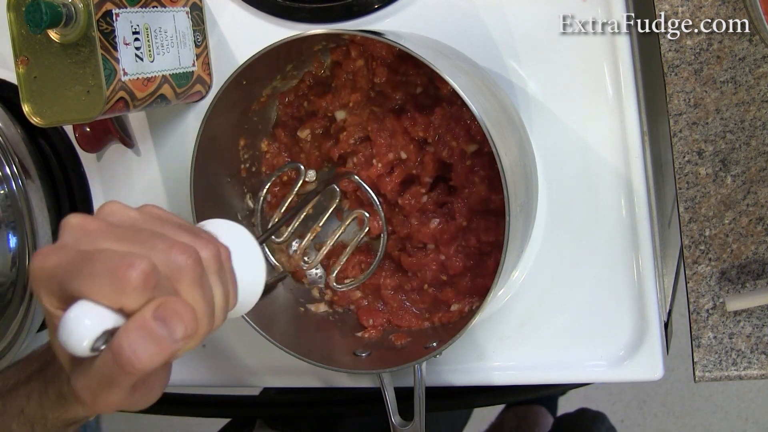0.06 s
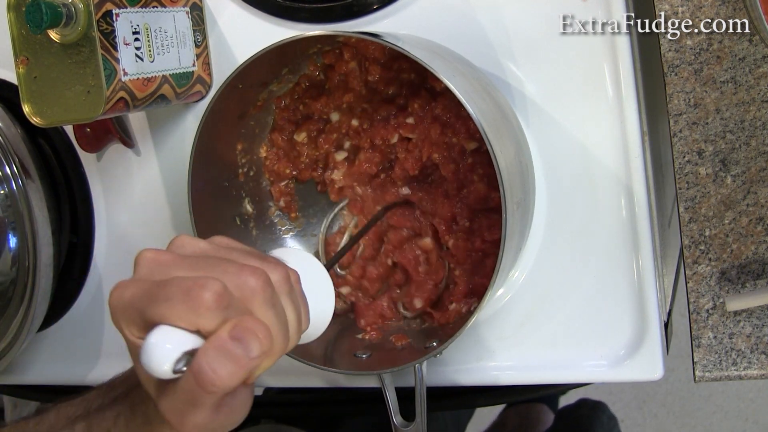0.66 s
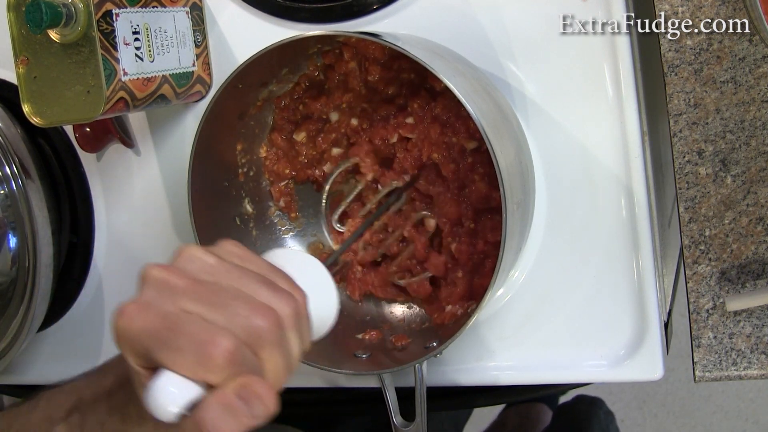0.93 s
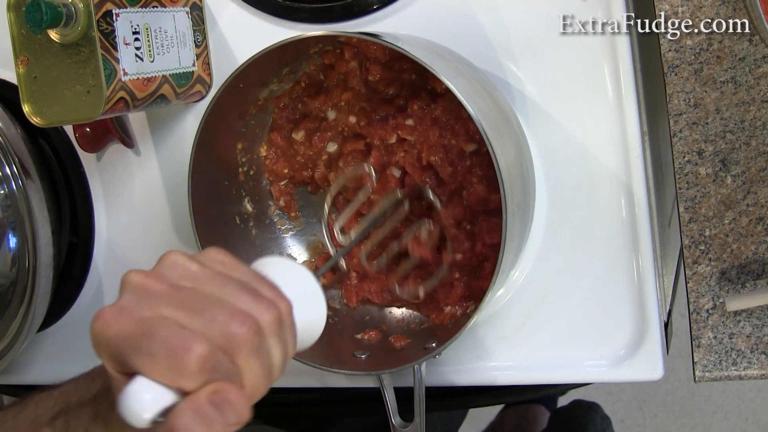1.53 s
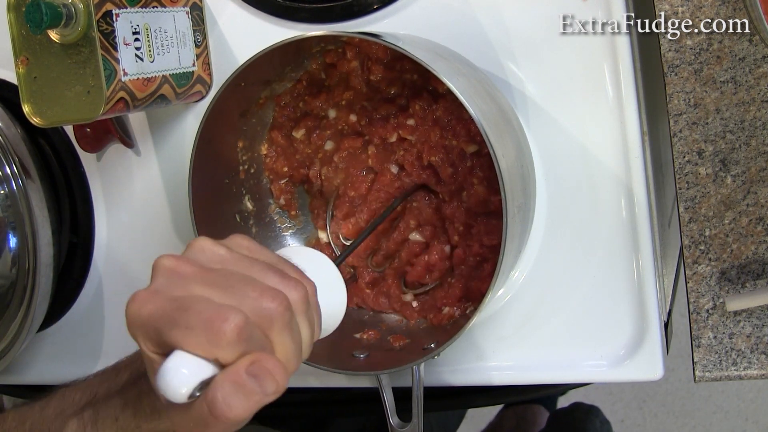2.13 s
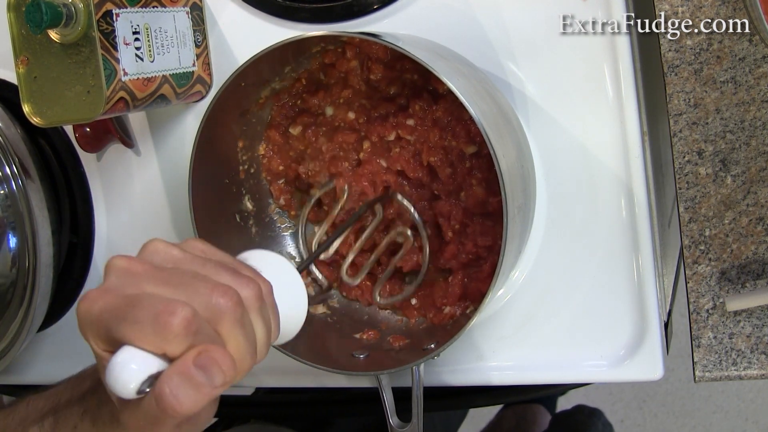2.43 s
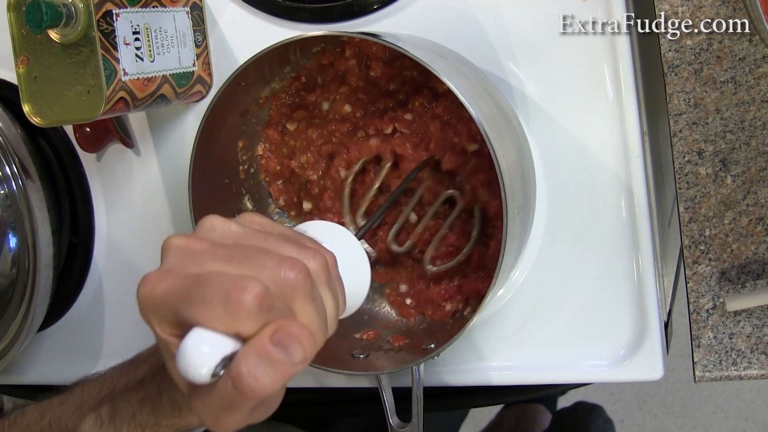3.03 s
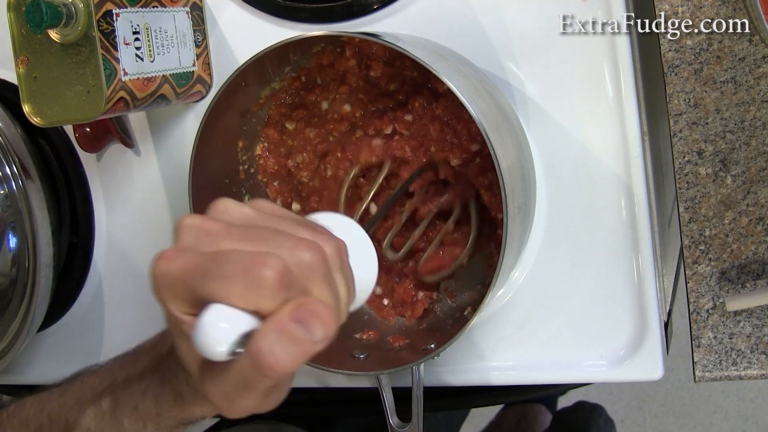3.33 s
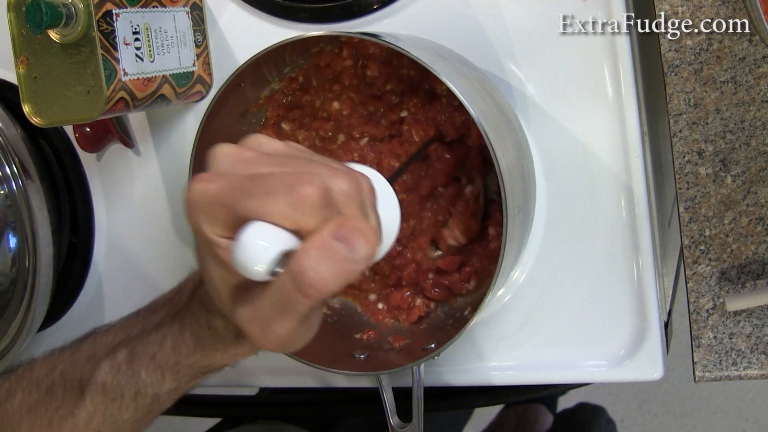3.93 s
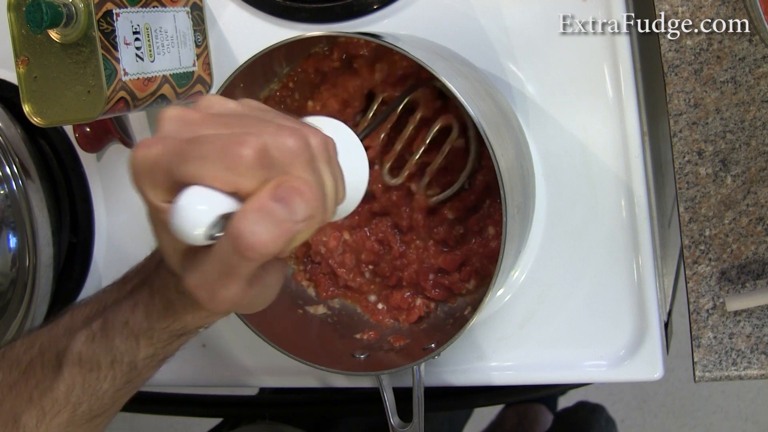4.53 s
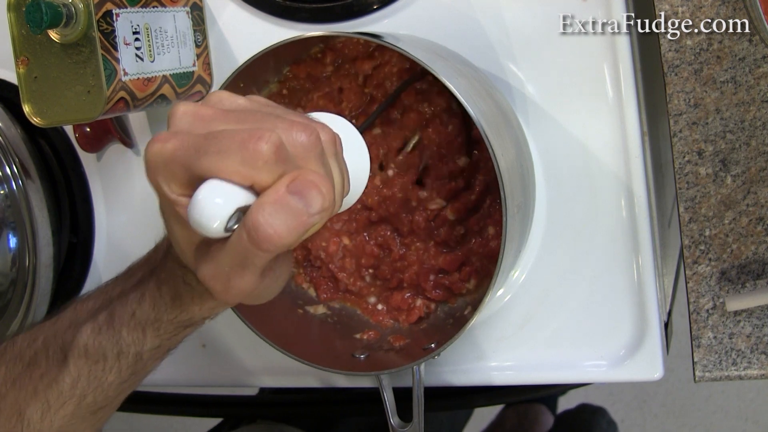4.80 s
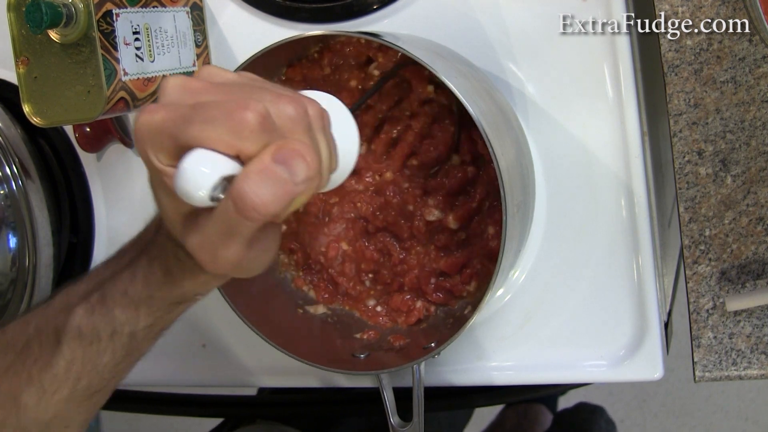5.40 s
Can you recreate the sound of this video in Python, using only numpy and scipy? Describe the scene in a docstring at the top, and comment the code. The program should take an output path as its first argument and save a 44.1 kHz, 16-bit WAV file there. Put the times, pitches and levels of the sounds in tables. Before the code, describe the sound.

A wire masher works tomatoes in a steel saucepan, heard close up in a small kitchen with faint low room noise. At about 0.1 seconds comes a sharp double clink with a bright, short ring, followed by brief scrapes and a judder across the pan bottom. Another hard, bright knock lands at 0.7 seconds, trailing into light scraping. From about 0.8 seconds the pulp squelches softly in uneven strokes, with small wet pops and fine crackles. Lighter knocks fall at 1.8 and 2.2 seconds, then a stronger one at 2.6 with a short, hollow judder. More ringing clanks follow at about 3.0, 3.3 and 3.9 seconds, mixed with the squishing. From 4 seconds the metal knocks stop, leaving quieter moist squelches and little popping air pockets until the end at around 5.6 seconds.

```python
"""A small kitchen, where a wire potato masher crushes tomatoes in a steel saucepan close to a camera.
Impact and friction excite the normal modes of wire and pan, so both ring with each knock and scrape.
The pulp squelches as its wet cells burst, air pockets pop as resonant cavities, and juice films crackle.
The camera's limiter ducks each hard knock and lets the ringing and the room swell back."""
import sys
import numpy as np
from scipy import signal
from scipy.fft import rfft, irfft, next_fast_len
from scipy.io import wavfile
from scipy.ndimage import uniform_filter1d, minimum_filter1d, map_coordinates

SR = 44100
rng = np.random.default_rng(int(sys.argv[2]) if len(sys.argv) > 2 else 0)


def unload_audio(sound):
    """Save the sound as a 16-bit wav file, at the path given as the first command line argument."""
    columns = np.transpose(np.atleast_2d(sound))
    # keep every value between -1 and 1, then stretch to whole-number steps
    steps = np.round(np.clip(columns, -1, 1) * 32767)
    wavfile.write(sys.argv[1], SR, steps.astype(np.int16))


N = 245195

# Larger air pockets in the pulp. Each row: start in seconds, level in dB, starting pitch in Hz,
# pitch rise in octaves, relative spray level in dB, cavity t60 (time to fall 60 dB) in seconds.
AIR_POCKETS = [(.051, -29.5, 7680, 0.83, -8.5, .012), (1.302, -23.5, 1040, 0, -5.5, 0.021),
               (1.75, -22, 2770, .22, -2.5, 0.016), (1.96, -29.5, 1907, 0, -32, .049),
               (2.2008, -22.5, 2570, .29, -2, 0.034), (2.878, -26.5, 3330, 0, -13.5, 0.015),
               (2.9015, -38, 9120, .1, -6, 0.018), (2.918, -36.5, 9500, 0.27, -33, .02),
               (3.499, -41, 10000, .1, -1, .02), (3.6095, -18, 1913, 0.26, -9, 0.012),
               (3.7369, -23, 1257, 0, -15, 0.021), (3.759, -23, 2497, 0, -3.5, 0.062),
               (3.8741, -23, 2220, 0.18, 9.5, 0.022), (4.1857, -22, 2470, 0.96, -23, 0.077),
               (4.4475, -30.5, 3950, 0.045, 2, 0.043), (4.485, -20.5, 1140, 0.42, -22, 0.011),
               (4.703, -37, 10200, 0.3, -5, .021), (4.7274, -38, 4054, 0, 6, .024),
               (4.7422, -31.5, 2440, .15, 5, .033), (4.793, -19.5, 1870, .12, -2, 0.016),
               (5.0742, -25.5, 10640, .56, -2, .015), (5.0841, -20.5, 1385, 0.75, -28, 0.023),
               (5.218, -36.5, 10180, .14, -8, 0.049), (5.4005, -29.5, 5820, .05, 7.5, 0.065),
               (5.478, -28.5, 1390, 0.34, -8.5, 0.021)]
# Blows of wire on pan. Each row: start in seconds, strength in dB, relative thud, clang and lasting
# ring in dB, tilt in dB per octave, three frequencies in Hz that the contact point favours.
KNOCKS = [(0.1299, 0, -15, 0, 2, 5, 2788, 6384, 10992),
          (.1555, 3.5, -19.5, -21, -23, -2.6, 4586, 10992, 7472),
          (0.3491, -17, 3.5, 2, -13.5, -5, 1040, 2788, 8042),
          (.6840, 8, -26, -34.5, -9.5, 4, 4322, 7680, 8400), (0.7438, -9, -3, -25, -6, 1, 4322, 8620, 3330),
          (1.7926, -9, 0, -1, -38, -8, 3330, 5394, 8042), (2.219, -6, -2, 1, -38, -5, 5394, 8042, 8400),
          (2.5928, 1, -7, -15, -23.5, 0, 3930, 7472, 8042),
          (2.9599, 0, -6.5, -6, -32, -3.3, 1920, 3330, 10400),
          (3.2791, -5.5, -9.5, -7.5, -4.5, -0.7, 1550, 2562, 8400),
          (3.9035, -6.5, -10, -3.5, -27, 0.7, 1920, 2562, 10080)]
# Ringing modes of wire and pan. Each row: frequency in Hz, level in dB, t60 in seconds.
STEEL_MODES = [(1040, -5, .22), (1550, -3, .12), (1920, -5, .16), (2562, -5, .1), (2792, 0, .3),
               (2990, -6, .22), (3330, -5, .2), (3930, -3, .14), (4322, 1.5, .42), (4586, -3, .24),
               (5157, -4, .22), (5390, -1, .25), (5720, -2, .22), (6130, -4, .18), (6390, -1, .18),
               (6670, -3, .22), (7474, -1, .24), (7680, -3, .2), (8045, 0, .18), (8400, -1, .19),
               (8620, -3, .2), (8860, -5, .16), (10080, -5, .15), (10400, -5, .15), (10990, -2, .17),
               (11627, -2, .19), (12650, -3, .14), (13050, -6, .1)]
# Modes of the pan's body, damped by the pulp. Each row: frequency in Hz, bandwidth in Hz, level in dB.
BOTTOM_MODES = [(142, 14, -0.5), (193, 26, -8), (304, 68, -6.5), (511, 100, 0.5), (555.5, 89, 3.5),
                (647, 190, -6.5)]
WALL_MODES = [(584, 83, -7.5), (988, 47, 2), (1084, 68, 4), (1329, 67, 3), (1795, 65, -1.5),
              (2060, 120, -5), (2930, 600, -5.5), (3190, 53, -39.5)]
# Wire dragged on bare steel. Each row: start and length in seconds, wall and wire levels in dB.
SCRAPES = [(0.149, 0.017, -19, -8), (0.201, 0.079, -33, -22), (0.392, 0.06, -14.5, -19),
           (0.737, 0.062, -59, -26), (0.795, 0.056, -42, -35), (.875, 0.074, -33, -44.5),
           (0.973, 0.014, -31, -44), (1.446, 0.033, -40.5, -71), (1.506, 0.021, -35.5, -41.5),
           (2.677, 0.029, -27, -30.5), (3.095, 0.027, -31.5, -54), (3.982, 0.025, -26, -36.5)]
# Wire juddering over the bottom. Each row: start and length in seconds, pitch in Hz, level in dB.
JUDDERS = [(0.165, 0.17, 602, -33), (0.346, 0.06, 584, -29), (0.721, .12, 579.5, -26.5),
           (2.589, .03, 539, -16), (2.625, 0.029, 537, -20), (2.652, .03, 511, -35)]
# Strokes into the pulp. Each row: start, sinking time and pressing time in seconds,
# then slosh, squelch and peel levels in dB.
STROKES = [(.835, 0.033, 0.038, -34.5, -39, -63), (1.298, 0.007, 0.062, -35, -36.5, -51.5),
           (1.779, 0.0041, 0.013, -46, -40.5, -43.5), (1.94, .015, 0.02, -50, -50.5, -71),
           (2.22, 0.044, 0.0099, -34.5, -31, -74), (2.62, 0.075, 0.011, -38.5, -37.5, -63),
           (2.97, 0.045, 0.025, -33.5, -29.5, -49.5), (3.593, 0.0054, 0.061, -36.5, -39.5, -54),
           (3.665, 0.028, 0.017, -44.5, -45, -64.5), (3.735, 0.011, 0.017, -44.5, -36, -56.5),
           (3.898, 0.024, 0.011, -31, -29, -51), (4.198, 0.013, 0.055, -39.5, -39.5, -47.5),
           (4.479, 0.0048, 0.0086, -37.5, -39.5, -52.5), (4.521, 0.016, 0.11, -44.5, -39.5, -61),
           (4.783, 0.011, .025, -38, -37.5, -55), (4.96, 0.018, 0.015, -52, -49, -66),
           (5.09, 0.017, 0.032, -45, -42.5, -52.5), (5.42, .025, .015, -36, -39.5, -48.5),
           (5.474, .012, 0.023, -37, -31, -58.5)]
# Spectra of the noisy sounds. Each row: frequency in Hz, relative spectral density in dB.
BACKGROUND_SPECTRUM = [(20, -43.5), (40, -29), (62, 4.5), (100, 2), (150, 4), (250, 0), (600, -4),
                       (1200, -4), (2500, -13.5), (5000, -21.5), (10000, -27), (16000, -29.5)]
SPRAY_SPECTRUM = [(500, -23.5), (2000, -10), (4000, -10), (8000, -8), (12000, -15), (16000, -18.5)]
CRACK_SPECTRUM = [(200, -47), (1200, -6), (2500, -18), (4000, 7), (8000, 6.5), (10000, 1.5), (13000, -6.5),
                  (16000, -13)]
SLOSH_SPECTRUM = [(25, -42), (45, -16), (65, -15.5), (100, -16), (140, -0.5), (185, -3), (250, -16.5),
                  (400, -15.5), (600, -3.5), (800, -16.5), (1600, -60)]
SQUELCH_SPECTRUM = [(200, -11), (400, 0.5), (600, -9), (700, 3), (850, 0.5), (1250, -1), (1900, -4),
                    (2700, -6.5), (4000, -14.5), (6000, -18.5), (9000, -34.5), (16000, -59)]
# Reverberation of the kitchen. Each row: frequency in Hz, t60 in seconds.
ROOM_T60 = [(150, 0.99), (600, 0.34), (2000, 0.36), (6000, 0.34), (10000, 0.19), (15000, 0.22)]

GRIP_S, SCRAPE_SWELL_DB, SLIP_DB_PER_S = 0.018, 9.5, 907
PEEL_LEAD_S, PEEL_S = 0.054, 0.063  # sticky pulp peels off the wire ahead of each stroke
SLOSH_DB_PER_S, SQUELCH_DB_PER_S = 94, 135.5  # decay once the hand stops pushing
LOW_CUT_HZ, TOP_HZ = 48, 16000


def amp(db):
    """Amplitude grows tenfold for every 20 dB."""
    return 10 ** (np.asarray(db) / 20)


def unit(x):
    """Normalisation to rms 1."""
    return x / np.sqrt(np.mean(x ** 2) + 1e-20)


def fade(t, t60):
    """Exponential decay, 60 dB in t60 seconds."""
    return np.exp(-np.log(1000) * t / max(t60, 1e-4))


def along(points, hz):
    """Interpolation of (Hz, value) points on a logarithmic frequency axis."""
    point_hz, values = np.transpose(points)
    return np.interp(np.log(hz + 1), np.log(point_hz + 1), values)


def filtered(x, response):
    """Linear filtering multiplies the spectrum by a frequency response."""
    size = next_fast_len(len(x) + SR // 4)
    return irfft(rfft(x, size) * response(np.fft.rfftfreq(size, 1 / SR)), size)[:len(x)]


def coloured(x, spectrum):
    """Spectral shaping of x, at rms 1."""
    return unit(filtered(x, lambda hz: amp(along(spectrum, hz))))


def resonate(x, modes):
    """Forced response of damped resonators, summed with alternating signs, at rms 1."""
    def response(f):
        return sum((-1) ** k * amp(db) * 1j * f * width / (hz * hz - f * f + 1j * f * width)
                   for k, (hz, width, db) in enumerate(modes))
    return unit(filtered(x, response))


def tone(hz, blur):
    """Phase diffusion broadens a sine's spectral line; blur is the random step in radians."""
    steps = 2 * np.pi * hz / SR + blur * rng.standard_normal(len(hz))
    return np.sin(rng.uniform(0, 2 * np.pi) + np.cumsum(steps))


def grains(rate, spread_db):
    """Shot noise: random impulses of uneven size, rate a second, at rms 1."""
    sizes = amp(spread_db * np.clip(rng.standard_normal(N), -2, 2)) * rng.choice([-1, 1], N)
    return unit(sizes * (rng.random(N) < rate / SR))


def bubbles(count, centre_hz, octaves, cycles, spread_db):
    """Tiny bubbles ring as damped oscillators for a few cycles at random times, at rms 1."""
    start, pitch, size = rng.random((count, 3)).T[:, :, None]
    hz = np.minimum(centre_hz * 2 ** (octaves * (pitch - .5)), SR / 3)
    k = np.arange(SR // 200)
    age = hz * k / SR / cycles
    waves = amp(spread_db * size) * np.sin(2 * np.pi * hz * k / SR) * age * np.exp(-4 * age)
    positions = (start * N).astype(int) + k
    return unit(np.bincount(positions.ravel(), waves.ravel(), N)[:N])


def wobble(rate):
    """Smooth random modulation, rate knots a second."""
    return map_coordinates(rng.standard_normal(int(N * rate / SR) + 4), [np.arange(N) * rate / SR])


def add(track, start, sound):
    """Superposition of a sound on the track, from start in seconds."""
    part = track[max(round(start * SR), 0):][:len(sound)]
    part += sound[:len(part)]


def background():
    """Stationary noise, strongest in the bass, fills the kitchen."""
    return amp(-52.5) * coloured(rng.standard_normal(N), BACKGROUND_SPECTRUM)


def pops():
    """Cavity resonance: an air pocket rings, most often rising in pitch as it opens, and throws spray."""
    out, t = np.zeros(N), np.arange(SR // 10) / SR
    opened = np.minimum(t / 0.0076, 1)
    for start, db, hz, rise, spray_db, t60 in AIR_POCKETS:
        cavity = tone(hz * 2 ** (rise * opened), blur=np.sqrt(hz / SR) / 2) * fade(t, t60)
        spray = amp(spray_db - 4) * coloured(rng.standard_normal(len(t)), SPRAY_SPECTRUM)
        add(out, start, amp(db - 3) * (cavity + spray * fade(t, 0.035)) * (1 - fade(t, 0.00092)))
    return out


def reverberation(x):
    """Reflections from hard surfaces merge into a dense tail whose treble dies first."""
    hz, t, spectra = signal.stft(rng.standard_normal(int(SR * .7)), SR, nperseg=256)
    decay = amp(-60 * t / along(ROOM_T60, hz)[:, None])
    tail = signal.istft(spectra * decay, SR, nperseg=256)[1]
    tail *= 1 - fade(np.arange(len(tail)) / SR, 0.05)
    return signal.fftconvolve(x, tail / np.linalg.norm(tail))[:N]


def contact(t, t60):
    """Elastic rebound: the springy wire touches down twice, starting two decays."""
    since_rebound = t - .0042
    return fade(t, t60) + amp(-6) * (since_rebound > 0) * fade(abs(since_rebound), t60)


def knocks():
    """Impact excites the normal modes of wire, bottom and wall; the pulp soon damps the ringing."""
    out, t = np.zeros(N), np.arange(SR // 2) / SR
    mode_hz, mode_db, mode_t60 = np.transpose(STEEL_MODES)
    for start, db, thud_db, clang_db, ring_db, tilt_db, *favoured in KNOCKS:
        lift_db = 2 * rng.standard_normal(len(mode_hz))
        lift_db[[np.argmin(abs(mode_hz - hz)) for hz in favoured]] = 12
        struck_db = mode_db + lift_db + tilt_db * np.log2(mode_hz / 5000)
        # the wire keeps sliding, which blurs each mode
        ring = sum(amp(level) * fade(t, t60) * tone(np.full(len(t), hz), blur=.06)
                   for hz, level, t60 in zip(mode_hz, struck_db, mode_t60))
        ring *= amp(-29) * (contact(t, 0.067) + amp(ring_db))
        noise = rng.standard_normal((4, len(t)))
        broad_modes = [(hz, 170, level) for hz, level in zip(mode_hz, struck_db)]
        crack = amp(-4.5) * coloured(noise[0], CRACK_SPECTRUM) * contact(t, 0.015)
        thud = amp(thud_db - 18.5) * resonate(noise[1], BOTTOM_MODES) * fade(t, 0.32)
        clang = amp(clang_db - 16.5) * resonate(noise[2], WALL_MODES) * fade(t, 0.18)
        chatter = amp(-8) * resonate(noise[3], broad_modes) * contact(t, 0.016)
        add(out, start, amp(db) * (ring + chatter + crack + thud + clang) * (1 - fade(t, .0025)))
    return out


def drag(start, length):
    """Friction envelope: the wire bites, grows louder under the hand, then slips free."""
    age = np.arange(N) / SR - start
    swell_db = -SCRAPE_SWELL_DB * np.clip(1 - age / length, 0, 1)
    release_db = -SLIP_DB_PER_S * np.maximum(age - length, 0)
    return np.clip(age / GRIP_S, 0, 1) * amp(swell_db + release_db)


def scrapes():
    """Stick-slip friction: tiny slips of wire on steel drive the wall's modes and the wire's own."""
    wall_gain, wire_gain = sum(np.outer(amp([wall_db, wire_db]), drag(start, length))
                               for start, length, wall_db, wire_db in SCRAPES)
    slips = grains(rate=5400, spread_db=2.5)
    singing = resonate(slips, [(hz, 40, db) for hz, db, _ in STEEL_MODES])
    wire = amp(-5) * singing + amp(-6) * coloured(slips, CRACK_SPECTRUM)
    return amp(-2) * wall_gain * resonate(slips, WALL_MODES) + wire_gain * wire


def judders():
    """Forced vibration: the skidding wire draws a wavering drum note from the bottom and stirs the wall."""
    out = np.zeros(N)
    for start, length, hz, db in JUDDERS:
        size = int(length * SR)
        drum = tone(np.full(size, hz), blur=0.062)
        wall = amp(-16.5) * resonate(rng.standard_normal(size), WALL_MODES)
        add(out, start, amp(db) * signal.windows.tukey(size, .6) * (drum + wall))
    return out


def push(start, sink, hold, settle_db_per_s):
    """Stroke envelope: a linear rise as the wire sinks, a hold under the hand, exponential relaxation."""
    age = np.arange(N) / SR - start
    return np.clip(age / sink, 0, 1) * amp(-settle_db_per_s * np.maximum(age - sink - hold, 0))


def inside_pan(x):
    """Multiple reflection between the pan's walls, along paths that the moving masher changes."""
    out, t = np.zeros(N), np.arange(SR // 40) / SR
    step = int(.05 * SR)  # new echo paths every 50 ms
    for first in range(0, N, step):
        echoes = rng.standard_normal(len(t)) * fade(t, 0.025)
        add(out, first / SR, signal.fftconvolve(x[first:first + step], echoes / np.linalg.norm(echoes)))
    return out


def crackle():
    """Film rupture: juice films burst as the wire lifts, and strays snap while the pulp is disturbed."""
    peeling, disturbed = np.zeros((2, N))
    for start, sink, hold, _, squelch_db, peel_db in STROKES:
        add(peeling, start - PEEL_LEAD_S, amp(peel_db) * signal.windows.tukey(int(PEEL_S * SR), .5))
        disturbed += amp(squelch_db) * push(start, sink, hold, SLOSH_DB_PER_S)
    films = bubbles(count=2200, centre_hz=9800, octaves=1.86, cycles=3, spread_db=28.5)
    strays = bubbles(count=170, centre_hz=11200, octaves=1, cycles=5.9, spread_db=17)
    resting = bubbles(count=45, centre_hz=9900, octaves=0.37, cycles=6, spread_db=3.5)
    return inside_pan(peeling * films + amp(-23) * disturbed * strays + amp(-73.5) * resting)


def pulp():
    """Compression shifts the mass with a low slosh and bursts clumps of wet cells; lumps rub the wall."""
    slosh_gain, squelch_gain = np.zeros((2, N))
    for start, sink, hold, slosh_db, squelch_db, _ in STROKES:
        slosh_gain += amp(slosh_db) * push(start, sink, hold, SLOSH_DB_PER_S)
        squelch_gain += amp(squelch_db) * push(start, sink, hold, SQUELCH_DB_PER_S)
    slosh = amp(-5) * coloured(grains(rate=900, spread_db=2), SLOSH_SPECTRUM)
    clumps = amp(2.2 * wobble(rate=60))
    cells = inside_pan(clumps * grains(rate=900, spread_db=4))
    lumps = resonate(grains(rate=450, spread_db=2), WALL_MODES)
    spits = inside_pan(bubbles(count=600, centre_hz=7100, octaves=1.8, cycles=2, spread_db=24.5))
    squelch = amp(-1) * coloured(cells, SQUELCH_SPECTRUM) + amp(-13) * lumps + amp(-21.5) * spits
    return slosh_gain * slosh + squelch_gain * squelch


def scene():
    """Superposition of direct sound, reverberant field and background noise, in one channel."""
    blows = knocks() + judders()
    rubbing = scrapes() + pulp()
    wet = pops() + crackle()
    room = reverberation(amp(-11) * blows + amp(-10.5) * rubbing + amp(-11) * wet)
    return (blows + rubbing + wet + room + background())[None]


def limiter(x, ceiling_db, release_db_per_s):
    """Look-ahead limiting: the gain drops just before a peak and recovers at a steady rate in dB."""
    over_db = np.maximum(20 * np.log10(abs(x) + 1e-9) - ceiling_db, 0)
    recovery_db = release_db_per_s * np.arange(N) / SR
    cut_db = np.maximum.accumulate(over_db + recovery_db) - recovery_db
    return x * amp(uniform_filter1d(minimum_filter1d(-cut_db, size=24), size=24))


def record(dry):
    """Band and peak limiting: the camera thins the deepest bass, ducks peaks and cuts the top treble."""
    thinned = signal.sosfilt(signal.butter(2, LOW_CUT_HZ, "highpass", fs=SR, output="sos"), dry[0])
    held = limiter(thinned, ceiling_db=-3, release_db_per_s=87)
    return filtered(held, lambda hz: hz < TOP_HZ)[None]


dry = scene()
out = record(dry)
unload_audio(out)
```